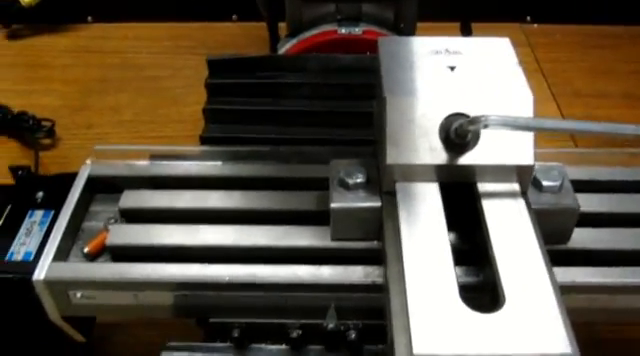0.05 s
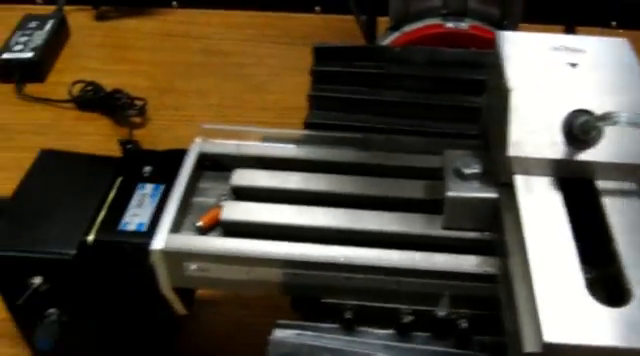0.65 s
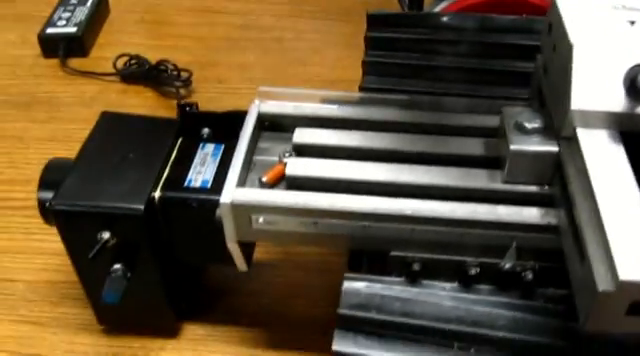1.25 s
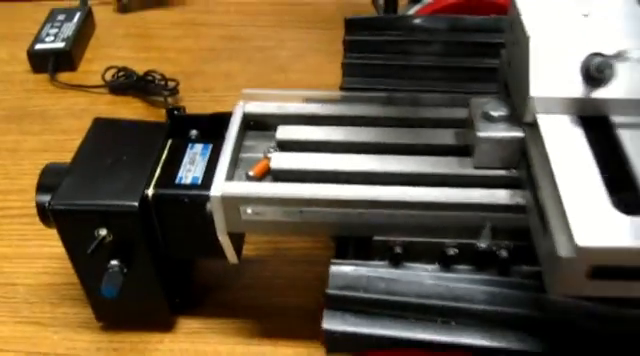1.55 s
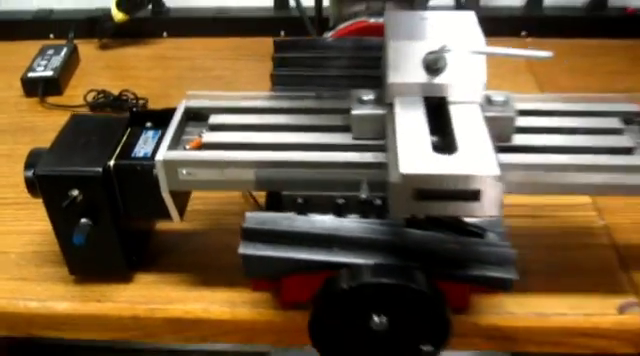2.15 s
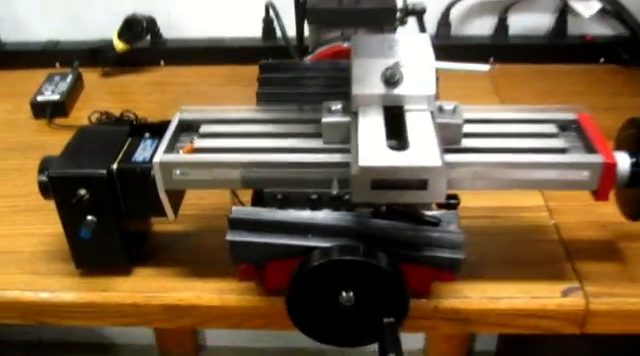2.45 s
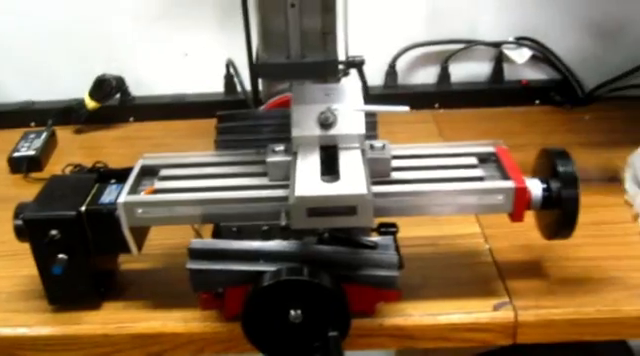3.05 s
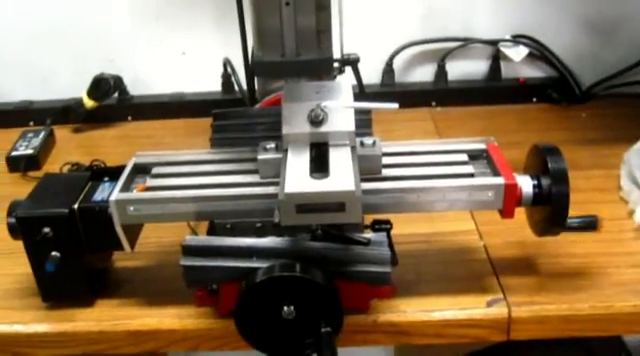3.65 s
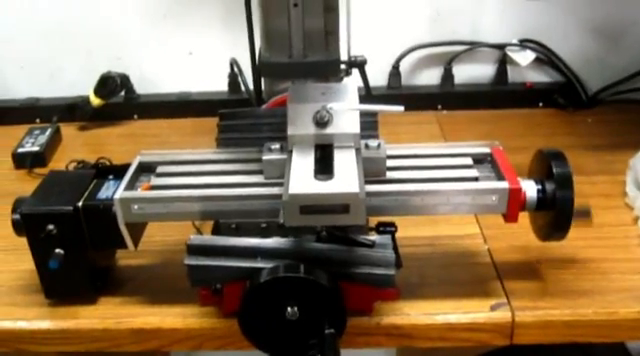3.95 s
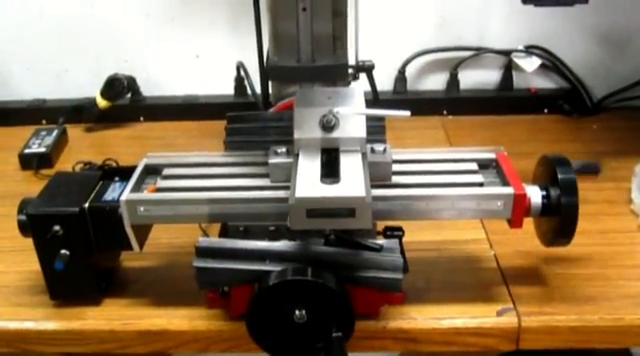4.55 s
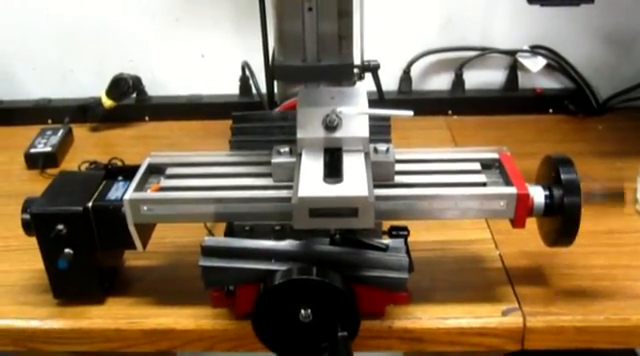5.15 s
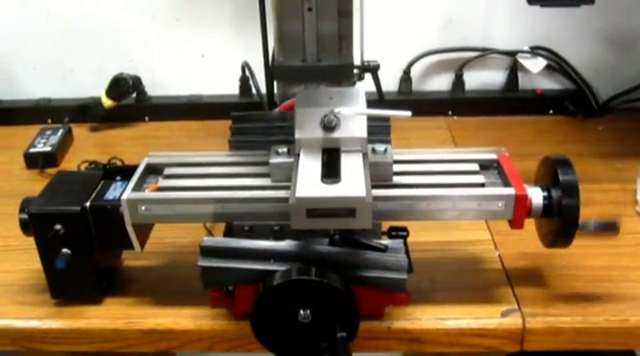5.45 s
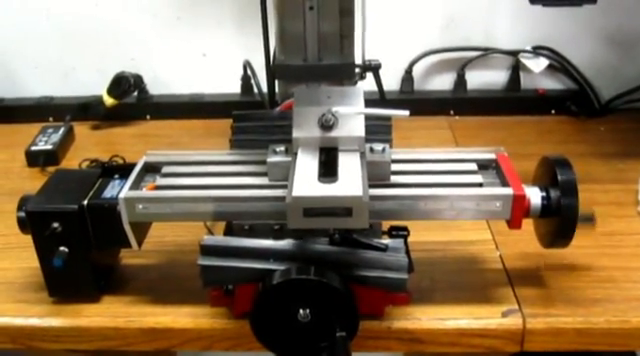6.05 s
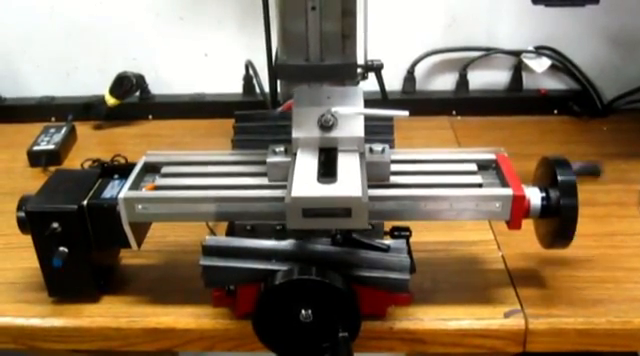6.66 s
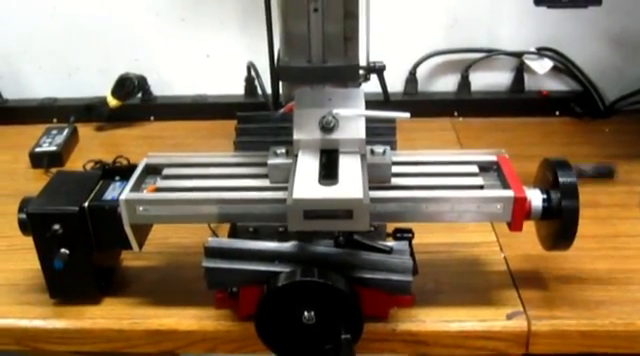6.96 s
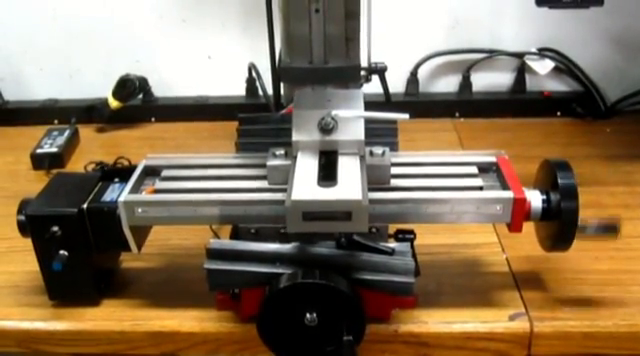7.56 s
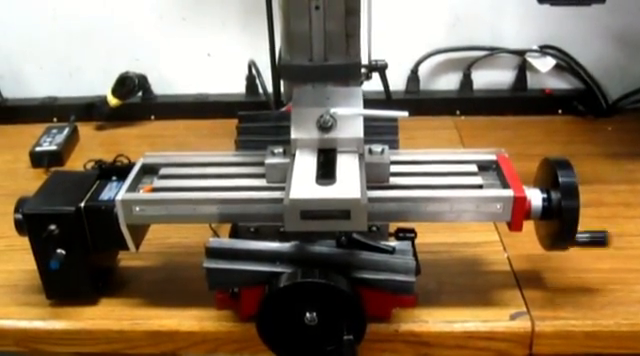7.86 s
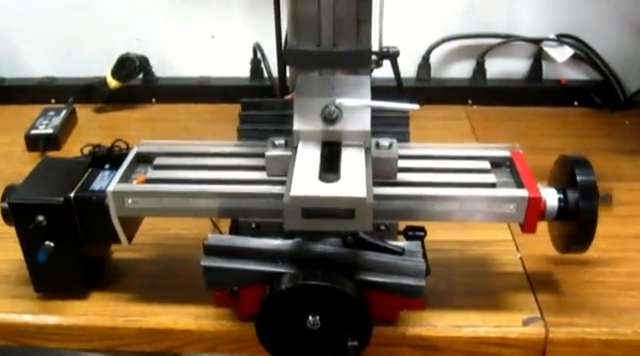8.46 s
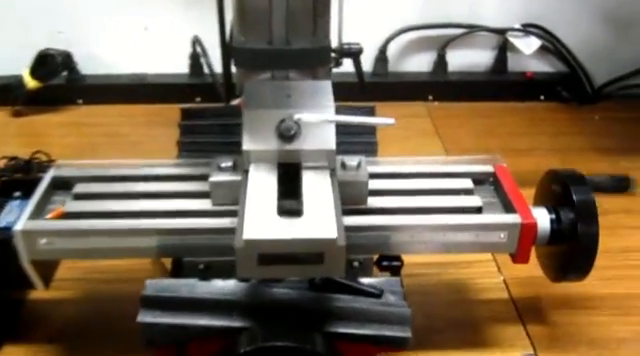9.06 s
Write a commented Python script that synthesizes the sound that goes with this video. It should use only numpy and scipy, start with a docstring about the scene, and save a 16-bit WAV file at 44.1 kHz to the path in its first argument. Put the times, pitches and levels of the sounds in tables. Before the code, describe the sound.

Continuous high whine of a small gearmotor turning a lead screw, gently pulsing over gear rattle and a low workshop rumble.

```python
"""First comes the wavering whine of a small DC gearmotor, as a ten-tooth gear turns a wheel four times
its size. It drives the screw of a milling table on a wooden bench. The screw binds (sticks) once a turn,
so the speed sags in waves that fade as the slide frees up. The motor's spinning rotor growls and buzzes,
high gear tones pulse, teeth rattle and brushes hiss over a low rumble and two soft knocks.
The listener starts beside the gearbox and moves to the front of the table."""
import sys
import numpy as np
from scipy import signal
from scipy.fft import rfft, irfft, next_fast_len
from scipy.io import wavfile
from scipy.ndimage import uniform_filter1d

SR = 44100
rng = np.random.default_rng(int(sys.argv[2]) if len(sys.argv) > 2 else 0)


def int16_out(signal):
    """Quantize to a 16-bit WAV file."""
    q = np.round(np.clip(np.atleast_2d(signal).T, -1, 1) * 32767)
    wavfile.write(sys.argv[1], SR, q.astype(np.int16))


N = 410130
TIME = np.arange(N) / SR
TEETH, WHEEL_TEETH = 10, 40  # on the small gear and on the wheel
SCREW_RATIO = 25  # rotor turns for one turn of the screw


# The tone of teeth meeting, its octave (the loudest) and the tone at three times its pitch.
# Each: t/s, level/dB, swell depth/0-1, screw angle at the top of the swell/turns
TOOTH_TONE = [(0, -42, 0.6, 0.74), (.15, -37.5, 0.3, 0.51), (1.5, -34.5, 0.2, 0.5),
              (3.3, -37.5, 0.22, 0.51), (4.6, -36, 0.36, 0.68), (5.7, -33.5, 0.3, 0.66),
              (8.2, -34, 0.18, 0.85), (9.3, -35, 0.37, 0.78)]
OCTAVE_TONE = [(0, -31, 0.2, 0.86), (.5, -35, .14, 0.75), (1.4, -30, 0.7, 0.74), (2.3, -35, 0.1, 0.41),
               (2.65, -28.5, 0.1, 0.51), (4, -29, 0.27, 0.31), (5.5, -27.5, 0.2, 0.51),
               (6.8, -27, 0.2, 0.6), (7.7, -27, 0.15, .25), (8.55, -36, 0.16, 0.44),
               (8.75, -25.5, 0.07, 0.86), (9.3, -23.5, 0.26, 0.6)]
TRIPLE_TONE = [(0, -38.5, 0.2, 0.78), (1.4, -34, 0.16, 0.73), (2.2, -38, 0.16, 0.97), (2.7, -34.5, 0.1, 1),
               (3.6, -38.5, 0.15, 0.26), (5, -36.5, 0.1, 0.074), (6.7, -40.5, 0.3, -0.018),
               (8.5, -34, 0, -0.00055), (9.3, -41.5, 0.3, 0.077)]
# A brief dip of the tooth tone in each screw turn: t/s, depth/dB, screw angle/turns
TOOTH_DIPS = [(0, 2, -.05), (2.2, 3, -.12), (3.6, 2, -.02), (4.6, 7, .04), (5, 7, .04), (5.7, 5, .2),
              (6.6, 5, .3), (8, 0, .3)]
def whine(turns, wheel, screw, speed_hz, flutter):
    """Meeting teeth whine; the wheel runs out of true and presses them together once a turn."""
    mesh = TEETH * turns
    wobble = .43 * cycle(wheel) + .22 * cycle(2 * wheel, lead=-.16) + .07 * cycle(3 * wheel, lead=-.2)
    grouping = .21 * cycle(wheel + screw, lead=.45) + .11 * cycle(wheel - screw, lead=.22)
    press = flutter * (wobble + binding() * grouping)
    slip = flutter * (.015 * cycle(wheel, lead=.25) + .061 * walk(73))
    tooth = unit(cycle(mesh + .12 * slip) * (1 + .15 * cycle(wheel) + .11 * walk(24)))
    octave = unit(cycle(2 * mesh + slip, lead=.25) * (1 + press + .15 * flutter * walk(55)))
    triple = unit(cycle(3 * mesh + slip) * (1 + .26 * walk(40)))
    depth_db, dip_at = curves(TOOTH_DIPS)
    from_dip = (screw - dip_at + .5) % 1 - .5
    dip_db = -depth_db * np.exp(-(from_dip / .08) ** 2)
    standing_wave_db = 4 * np.exp(-((speed_hz - 70.8) / .25) ** 2) - 1.3
    return (tooth * swell(TOOTH_TONE, screw, ripple_db=.74, ripple_at=.53) * undb(dip_db)
            + octave * swell(OCTAVE_TONE, screw, ripple_db=1.44, ripple_at=.27)
            + triple * swell(TRIPLE_TONE, screw, ripple_db=.5, ripple_at=.3) * undb(standing_wave_db))


def swell(table, screw, ripple_db, ripple_at):
    """A tone grows and fades once per screw turn, with two extra ripples while the screw binds."""
    db, depth, crest = curves(table)
    _, swing_hz = curves(ROTOR_SPEED)
    ripple = np.sqrt(swing_hz / swing_hz.max()) * cycle(2 * (screw - ripple_at))
    rise_and_fall = np.sqrt(1 + 2 * depth / (1 + depth ** 2) * cycle(screw - crest))
    return undb(db + ripple_db * ripple) * rise_and_fall


# How fast the rotor spins: t/s, middle speed/Hz, swing in each screw turn/Hz
ROTOR_SPEED = [(0.0, 69.77, 1.23), (1.0, 69.99, 1.21), (2.3, 70.37, 0.97), (4.0, 70.94, 0.79),
               (5.5, 71.39, 0.53), (7.0, 71.69, 0.18), (8.0, 71.86, 0.08), (9.3, 72.0, 0.0)]
# How easily the screw moves: screw angle/turns, share of the swing (-1 binding, 1 free)
SCREW_EASE = [(0.07, -0.83), (0.33, -0.4), (0.49, 1.0), (0.6, 0.45), (0.79, 0.58), (0.97, -0.6)]
def shafts():
    """Rotor speed, rotor turns and screw turns: the same tight spot slows each turn of the screw."""
    middle_hz, swing_hz = curves(ROTOR_SPEED)
    screw = np.cumsum(middle_hz) / SR / SCREW_RATIO
    speed_hz = middle_hz + swing_hz * np.interp(screw, *np.transpose(SCREW_EASE), period=1)
    return speed_hz, np.cumsum(speed_hz) / SR, screw


def binding():
    """How much the screw still binds: 1 at first, 0 once the slide is free."""
    _, swing_hz = curves(ROTOR_SPEED)
    return np.minimum(swing_hz / .6, 1)


# Six rotor speeds; standing waves favour each tone below at one pitch: speed/Hz
KNOCK_SPEEDS = [69.2, 70.1, 70.8, 71.3, 71.7, 72]
# A growl, and a lighter clack earlier in the turn: multiple of rotor speed, level/dB at each speed
GROWL_TONES = [(13, -52.5, -51.0, -51.0, -51.0, -55.0, -51.0),
               (14, -48.5, -47.0, -45.0, -44.0, -42.5, -44.0),
               (15, -36.5, -35.0, -33.5, -35.0, -38.5, -41.0),
               (16, -40.0, -39.5, -37.5, -36.5, -39.0, -40.0),
               (17, -43.0, -42.5, -41.0, -42.0, -47.0, -45.5),
               (18, -44.0, -48.0, -50.5, -52.0, -48.0, -48.0)]
CLACK_TONES = [(22, -47.0, -47.0, -46.0, -45.0, -49.0, -48.0),
               (23, -52.5, -50.5, -48.5, -50.0, -54.0, -55.0),
               (24, -44.5, -43.5, -41.5, -45.0, -45.5, -47.5),
               (25, -39.5, -39.0, -40.5, -44.0, -42.5, -44.5),
               (26, -51.0, -49.5, -46.0, -46.5, -52.0, -48.5)]
def rotor_knock(table, turns, speed_hz, at_turns, smear_turns, level_db):
    """One knock per rotor turn: neighbouring tones line up at one angle and spread into a chirp."""
    angle = turns - at_turns + .0015 * walk(60)
    centre = np.mean(np.transpose(table)[0])
    out = 0
    for multiple, *db in table:
        tone = cycle(round(multiple) * angle, smear_turns * (multiple - centre) ** 2)
        out += tone * undb(np.interp(speed_hz, KNOCK_SPEEDS, db) + 1.1 * walk(30))
    return np.sqrt(2) * out * undb(level_db + .36 * walk(70))


# High gear tones: multiple of rotor speed, level/dB beside the gearbox, halfway and in front,
# pulse size/dB, pulse head start/wheel turns, how strongly the tone follows the screw's swell
SINGING_TONES = [(40, -42, -44.5, -38.5, 4.0, .05, 1.9), (46, -43, -43.5, -38.5, 1.5, .08, 1.8),
                 (60, -53, -48.5, -42.5, 3.8, .05, .9), (71, -51, -51, -44, 6.0, .13, 1.8),
                 (95, -45.5, -51, -47, 1.0, .1, 1.6)]
def singing(turns, wheel, swell_db, place):
    """High gear tones pulse together once per wheel turn, more gently as the slide frees up."""
    strength = .45 + .55 * binding()
    slack = .0005 * walk(70)
    shared_db = .7 * walk(40)
    out = 0
    for multiple, *place_db, pulse_db, lead, follow in SINGING_TONES:
        pulse = cycle(wheel, lead) + .45 * cycle(2 * wheel, lead=.25)
        db = np.interp(place, [0, .5, 1], place_db) + shared_db + walk(45)
        db += strength * (follow * swell_db + (pulse_db + .5 * np.tanh(swell_db)) * pulse)
        out += undb(db) * cycle(multiple * (turns + slack), rng.random())
    return np.sqrt(2) * out


# Weaker tones: multiple of rotor speed, level/dB beside the gearbox, level/dB in front
WEAK_TONES = [(6, -65, -64), (8, -56, -60), (9, -60, -57), (11, -50, -52), (12, -56, -55), (19, -48, -47),
              (27, -51, -57), (28, -49, -52), (29, -52, -51), (31, -49, -56), (32, -50, -46),
              (33, -55, -43), (34, -40.5, -56), (35, -43, -56), (39, -50, -68), (41, -52, -53),
              (42, -56, -49), (45, -40, -55), (47, -47, -51), (48, -51, -49), (49, -48, -54),
              (50, -46, -52), (55, -48, -47), (62, -54, -55), (65, -50, -51), (70, -50, -51),
              (72, -54, -54)]
def overtones(turns, speed_hz, chatter_db, place, lift_db=.5, halfway_db=-3, echo_s=.014):
    """Uneven teeth and motor contacts add tones; slack between the teeth blurs the high ones."""
    slack = .0005 * walk(70)
    distance_db = halfway_db * np.sin(np.pi * place)  # the listener is furthest away halfway round
    out = 0
    for multiple, beside_db, front_db in WEAK_TONES:
        # an echo off the bench strengthens or weakens each tone as its pitch slides
        echo_db = 2.8 * cycle(multiple * speed_hz * echo_s, rng.random())
        db = beside_db + (front_db - beside_db) * place + 2.5 * walk(30)
        db += echo_db - np.mean(echo_db)
        db += min(multiple / 28, 1.5) * (chatter_db + distance_db) + min(multiple / 50, 1.3) * lift_db
        out += undb(db) * cycle(multiple * (turns + slack), rng.random())
    return np.sqrt(2) * out


# Screeching tones: multiple of rotor speed, level/dB beside the gearbox, partway round and in front
SCREECH_TONES = [(98, -57, -49, -52), (101, -58, -56, -57), (105, -60, -54, -53), (111, -53, -56, -54),
                 (125, -49, -50, -49), (128, -52, -55, -54), (131, -54, -50, -46), (133, -57, -55, -54),
                 (135, -50, -52, -62), (137, -53, -58, -56), (139, -53, -52, -51), (145, -57, -57, -52)]
def screech(turns, wheel, screw, place, drop_db=7):
    """Thin metallic tones rise while the screw runs free and fall back when it binds."""
    free = np.interp(screw, [.4, .48, .88, .98], [0, 1, 1, 0], period=1)
    slack = .0004 * walk(70)
    shared_db = -drop_db * binding() * (1 - free) + 1.7 * cycle(wheel, lead=.1)
    out = 0
    for multiple, *place_db in SCREECH_TONES:
        db = np.interp(place, [0, .65, 1], place_db) + shared_db + 2 * walk(35)
        out += undb(db) * cycle(multiple * (turns + slack), rng.random())
    return np.sqrt(2) * out


def bearing_buzz(turns, place, decay_turns=.22):
    """Once a turn the rotor scrapes in its bearing and rings the case, brighter beside the gearbox."""
    def scrape(at_turns):
        return rng.standard_normal(N) * np.exp(-((turns - at_turns) % 1) / decay_turns)
    lower = unit(band(scrape(at_turns=.86), low_hz=3120, high_hz=3560))
    upper = unit(band(scrape(at_turns=.58), low_hz=4400, high_hz=4900))
    return lower * undb(-37.5 - 4.5 * np.sqrt(place)) + upper * undb(-43 - 8.5 * place)


def rattle(turns, tooth_db=1.5, scatter_db=1.5, jitter_s=.000018):
    """Each tooth lands with a bright click of its own force and timing, so the pattern repeats."""
    hit = np.arange(int(turns[-1] * TEETH))
    tooth = hit % TEETH
    seat = rng.standard_normal(TEETH)
    force = unit(rng.standard_normal(TEETH))
    jitter, scatter = rng.standard_normal((2, len(hit)))
    at_s = np.interp((hit + .2 * seat[tooth]) / TEETH, turns, TIME) + jitter_s * jitter
    size = undb(tooth_db * force[tooth] + scatter_db * scatter)
    clicks = np.bincount(np.clip(np.round(at_s * SR), 0, N - 1).astype(int), size, N)
    clicks = signal.sosfilt(signal.butter(2, 5200, "high", fs=SR, output="sos"), clicks)
    return unit(ring(clicks, fade_s=.013, tail_db=33))


# Changes in the machine's noise: t/s, rattle/dB, hiss/dB, swell in each screw turn/dB
NOISE_LEVELS = [(0, -3.5, -0.5, -1), (.6, -2.5, 1, 0.5), (1.5, -2.5, -1, 1), (2.2, -2.5, -0.5, 1.5),
                (2.9, -2.5, -1.5, 1), (3.6, -3, -1.5, 2), (4.4, -1.4, 0.5, 2.5), (5.2, -0.7, 2.5, 1.5),
                (6.3, 1.5, 1, 0.6), (7.3, 2.5, 0.5, 1.9), (8.2, 2.5, 1.5, 0.5), (8.8, 2, 2, 0.5),
                (9.3, 1, 4, -0.5)]
# Tone colour of the gearbox shell: f/Hz, level/dB per Hz beside it, level/dB per Hz in front
HOUSING_COLOUR = [(464, -78, -83), (943, -65.5, -78.5), (1006, -57.5, -64), (1240, -58, -70),
                  (1394, -57, -57.5), (1600, -59.5, -69), (1740, -52.5, -65), (1880, -61.5, -75),
                  (2120, -59.5, -68.5), (2310, -69, -68.5), (2430, -58, -67), (2570, -65.5, -71.5),
                  (2860, -63.5, -69.5), (2900, -61, -66), (3430, -61, -70), (3600, -62, -69),
                  (3600, -61.5, -70.5), (4460, -67.5, -71), (4440, -60.5, -66.5), (5950, -63.5, -75.5),
                  (6600, -67.5, -75), (6800, -69, -75), (8550, -76.5, -78), (9000, -74, -73),
                  (9900, -71.5, -76), (10800, -76, -81), (12100, -74, -83), (15700, -100, -101)]
# Boost or cut of the metallic part of the noise: t/s, level/dB
METALLIC_BOOST = [(0, -1.5), (.4, -2), (.9, 0.5), (1.4, -1), (2.4, -1), (9.3, -0.5)]
def housing(turns, swell_db, chatter_db, place):
    """Tooth clicks and rubbing motor brushes, coloured by the gearbox and spread by the room."""
    rattle_db, hiss_db, _ = curves(NOISE_LEVELS)
    contact = 1 + .02 * cycle(turns, lead=.42) + .21 * cycle(TEETH * turns)
    rubbing = unit(contact * rng.standard_normal(N))
    rubbing = signal.sosfilt(signal.butter(1, 9000, fs=SR, output="sos"), rubbing)
    shaking = undb(-2.8) * rattle(turns) + undb(-3) * rubbing
    shaking = undb(.42 * chatter_db) * ring(shaking, fade_s=.2, tail_db=-3.5)
    hz, beside_db, front_db = np.transpose(HOUSING_COLOUR)
    sound = (1 - place) * colour(shaking, hz, beside_db) + place * colour(shaking, hz, front_db)
    sound += (undb(curves(METALLIC_BOOST)[0]) - 1) * band(sound, low_hz=4300, high_hz=7000)
    hiss = band(sound, low_hz=7900, high_hz=11000)  # grows as the screw runs free
    return (sound - hiss) * undb(rattle_db + .016 * swell_db) + hiss * undb(hiss_db + .83 * swell_db)


# Tone colour of the bench and workshop rumble: f/Hz, level/dB per Hz
RUMBLE_COLOUR = [(20, -92), (55, -86), (90, -83), (125, -81.5), (155, -75.5), (185, -80.5), (280, -77),
                 (400, -82), (480, -88), (620, -78), (1500, -105)]
# Knocks on the wood: t/s, level/dB, decay/s
WOOD_KNOCKS = [(1.794, -40.5, 0.067), (8.87, -49.5, 0.12)]
def bench(rumble_db):
    """A low rumble, and two soft knocks on the wood."""
    rumble = colour(rng.standard_normal(N), *np.transpose(RUMBLE_COLOUR))
    rumble *= undb(rumble_db + .5 * walk(3))
    blows = sum(undb(db) * (TIME > s) * np.exp(-np.abs(TIME - s) / decay)
                for s, db, decay in WOOD_KNOCKS)
    wood_band = signal.butter(2, [170, 360], "band", fs=SR, output="sos")
    return rumble + blows * unit(signal.sosfilt(wood_band, rng.standard_normal(N)))


def undb(db):
    """Turn decibels into a number to multiply by."""
    return np.exp(np.asarray(db) * (np.log(10) / 20))


def curves(table):
    """Join each column of a timed table into a line with one value per sample."""
    s, *columns = np.transpose(table)
    return [np.interp(TIME, s, column) for column in columns]


def unit(x):
    """Scale a sound to an average power of 1."""
    return x / np.sqrt(np.mean(x ** 2))


def walk(rate):
    """A random drift, about 1 in size, that changes course `rate` times a second."""
    return np.sqrt(3 / 2) * np.interp(TIME * rate, np.arange(4096), rng.standard_normal(4096))


def cycle(turns, lead=0):
    """One smooth swing per turn, with a head start of `lead` turns."""
    return np.cos(2 * np.pi * (turns + lead))


def band(x, low_hz, high_hz):
    """Keep the sound between two frequencies, without delaying it."""
    return signal.sosfiltfilt(signal.butter(2, [low_hz, high_hz], "band", fs=SR, output="sos"), x)


def colour(x, hz, db):
    """Shape an even hiss so that each frequency has its listed level in dB per Hz."""
    size = next_fast_len(N + 4096)
    f = np.maximum(np.arange(size // 2 + 1) * SR / size, 1)
    gain = undb(np.interp(np.log(f), np.log(hz), db)) * np.minimum(f / hz[0], 1) ** 2
    return irfft(rfft(x, size) * gain, size)[:N] * np.sqrt(SR / 2)


def ring(x, fade_s, tail_db):
    """Smear a sound with a tail that falls 60 dB in `fade_s`, keeping its tone colour."""
    t = TIME[:SR // 2]
    tail = rng.standard_normal(len(t)) * np.exp(-np.log(1000) * t / fade_s)
    response = rfft((t == 0) + undb(tail_db) * tail / np.linalg.norm(tail))
    power = uniform_filter1d(np.abs(response) ** 2, size=max(int(1 / fade_s), 1))
    return signal.fftconvolve(x, irfft(response / np.sqrt(power))[:SR // 4])[:N]


# The listener's path: t/s, place (0 beside the gearbox, 1 in front), flutter/0-1, rumble boost/dB
LISTENER_PATH = [(0, 0.066, 0.3, 1.5), (1.6, 0.016, 0.25, 0.5), (2.8, 0.59, 0.47, -1), (5, 0.71, 0.57, -1),
                 (6.5, 0.94, 0.48, -1), (7.6, 1, 0.6, -0.5), (8.3, 1, 0.1, 2), (8.8, 0.84, 0.17, 1.5),
                 (9.3, 0.84, 0.25, 0.5)]
def scene():
    """The turning rotor drives every part of the machine; both ears get the same sound."""
    speed_hz, turns, screw = shafts()
    wheel = turns * TEETH / WHEEL_TEETH
    place, flutter, rumble_db = curves(LISTENER_PATH)
    swell_db = curves(NOISE_LEVELS)[-1] * cycle(screw, lead=.41)
    # the teeth chatter once a wheel turn, hardest while the load is off them
    chatter = cycle(wheel, lead=.11) + .55 * cycle(2 * wheel, lead=.19)
    chatter_db = flutter * (1.15 + .3 * swell_db) * chatter
    sound = whine(turns, wheel, screw, speed_hz, flutter * (1.12 + .084 * swell_db))
    sound += rotor_knock(GROWL_TONES, turns, speed_hz, at_turns=.68, smear_turns=.06, level_db=-.5)
    sound += rotor_knock(CLACK_TONES, turns, speed_hz, at_turns=.45, smear_turns=.04, level_db=-1.2)
    sound += overtones(turns, speed_hz, .35 * chatter_db + .12 * swell_db, place)
    sound += singing(turns, wheel, swell_db, place)
    sound += screech(turns, wheel, screw, place)
    sound += bearing_buzz(turns, place) * undb(.23 * chatter_db)
    sound += housing(turns, swell_db, chatter_db, place)
    sound += bench(rumble_db)
    return np.array([sound, sound])


def record(dry):
    """Cut away the highest treble, above 15700 Hz."""
    return signal.sosfilt(signal.ellip(10, .2, 80, 15700, fs=SR, output="sos"), dry)


dry = scene()
out = record(dry)
int16_out(out)
```